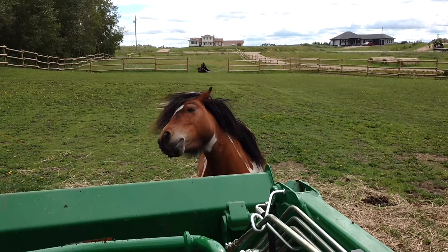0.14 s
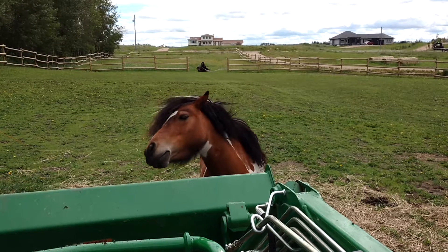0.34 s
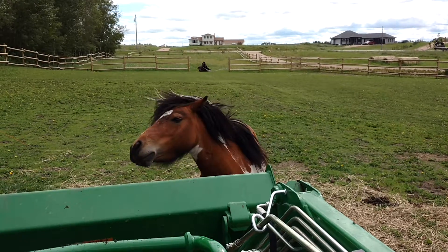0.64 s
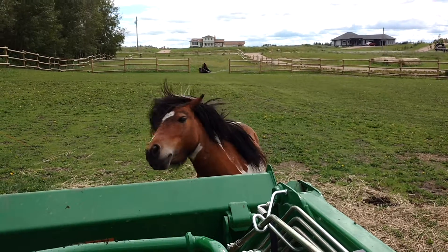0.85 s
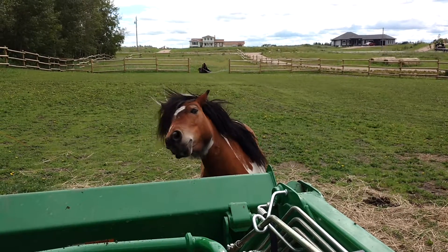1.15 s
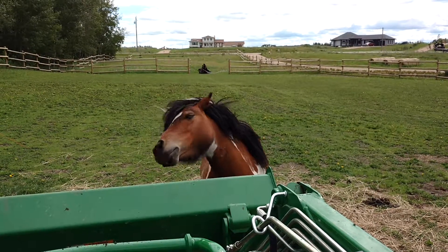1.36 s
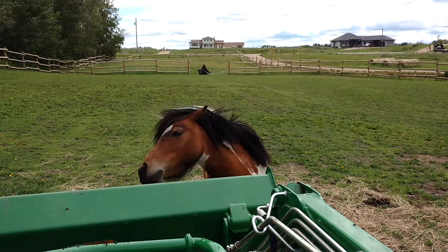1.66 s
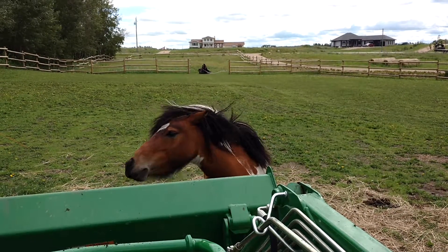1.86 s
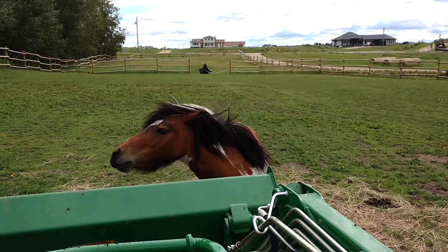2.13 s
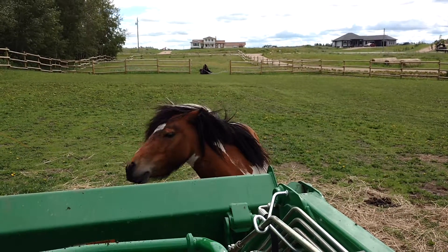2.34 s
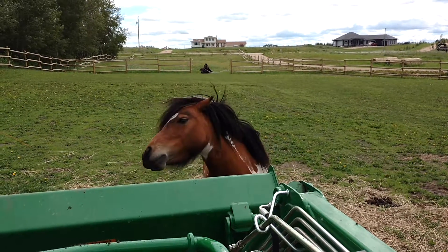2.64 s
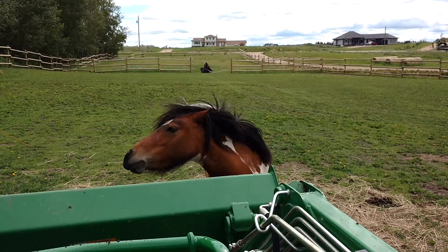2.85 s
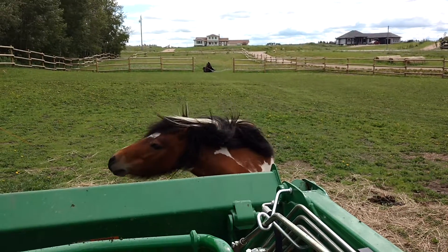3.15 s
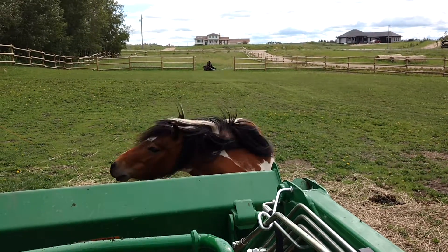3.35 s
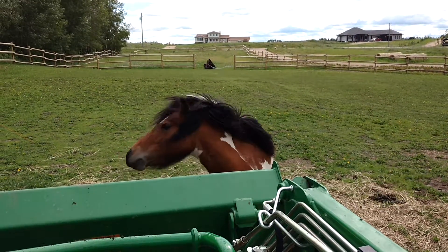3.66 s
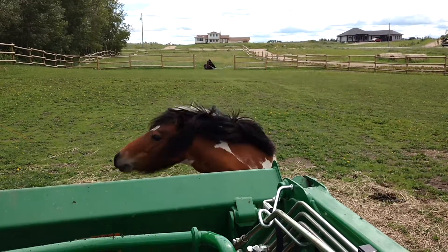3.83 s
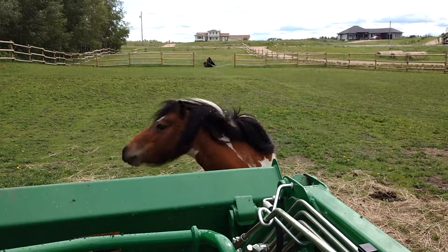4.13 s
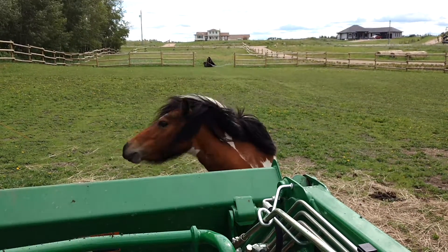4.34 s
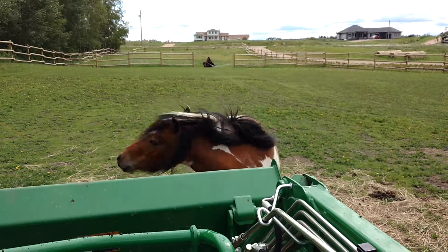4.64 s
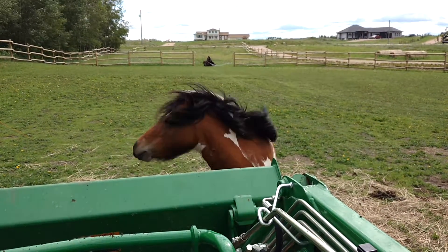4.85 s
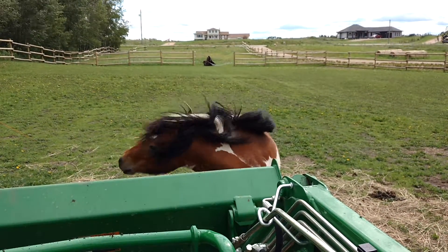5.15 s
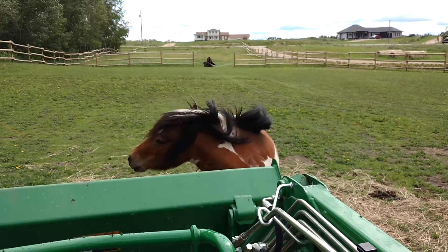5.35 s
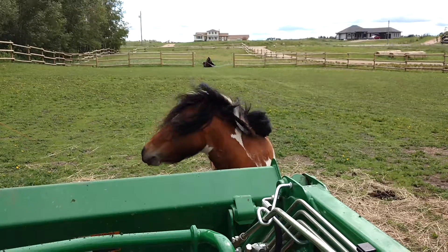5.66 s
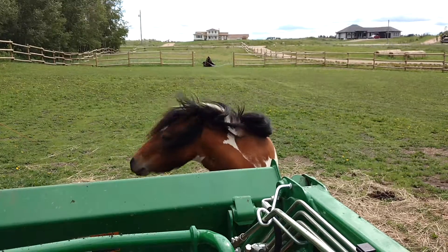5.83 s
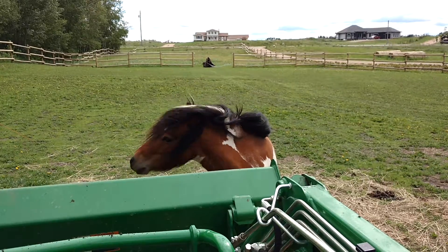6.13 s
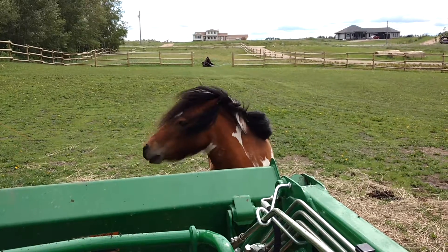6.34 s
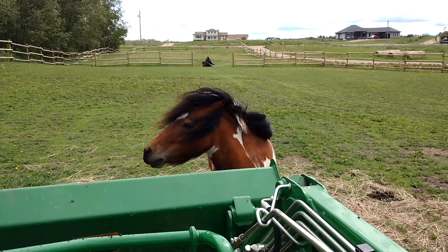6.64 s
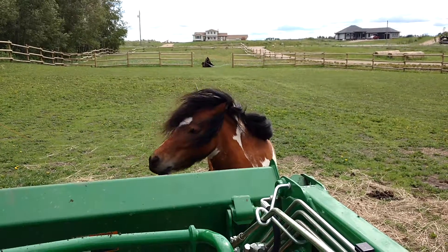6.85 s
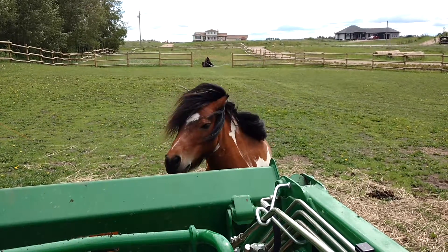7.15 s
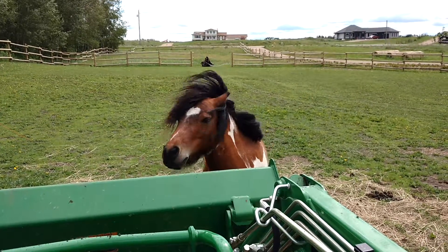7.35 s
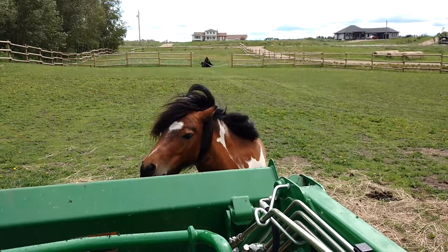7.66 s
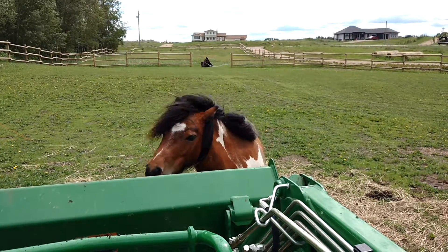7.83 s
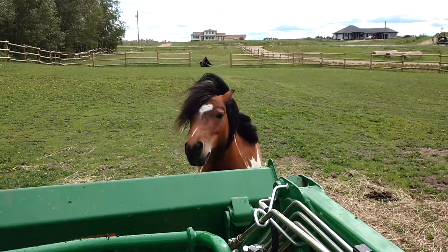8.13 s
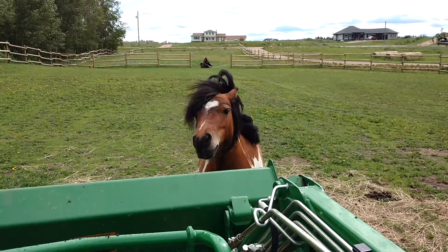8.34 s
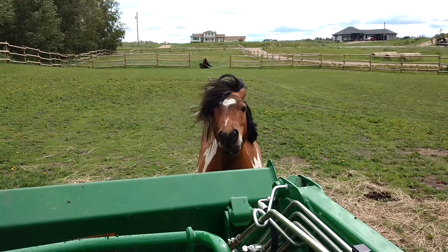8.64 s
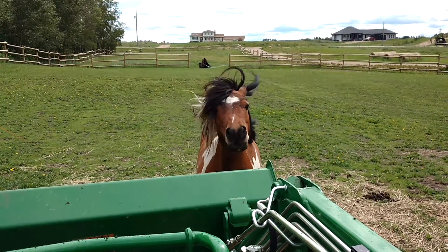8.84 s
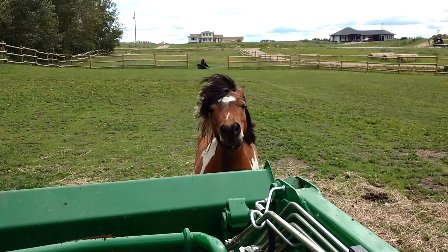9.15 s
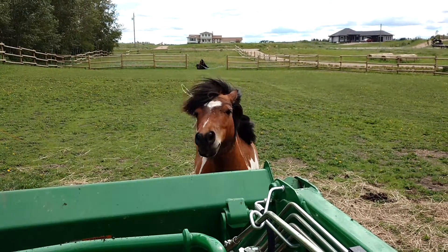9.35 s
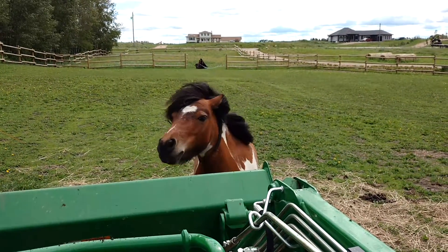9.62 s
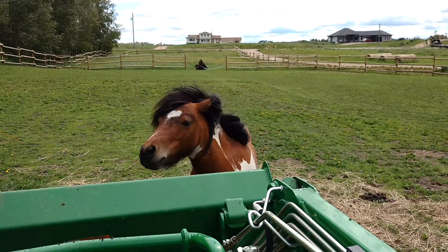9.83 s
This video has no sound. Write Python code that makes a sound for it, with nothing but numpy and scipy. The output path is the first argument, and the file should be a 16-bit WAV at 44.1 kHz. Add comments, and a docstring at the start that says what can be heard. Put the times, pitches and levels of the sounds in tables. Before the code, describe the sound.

From 0 to 10 seconds a small three-cylinder diesel tractor idles nearby in an open pasture. Its pace is constant, about thirteen uneven cycles a second, blurring into a quick chugging rattle: low exhaust drone, short hollow panel thuds, bright metallic knocks and hissy mechanical clatter. Some knocks stand out at irregular moments. Wind is only a faint low breeze at first, with soft buffets near 1.9 and 3.2. From 4.9 a strong gust rumbles and flaps on the close stereo microphone, continuing from 5.6 to 7.1 with brief hard eddies; shorter bursts follow around 7.1 to 8.6. A pop comes near 5.2, others at 7.1 and 7.9. The gust of 8.7 to 9.5 brings a cluster of sharp clicks and thumps from 9.1 to 9.4. Engine loudness dips repeatedly, deepest after 9.1, partly recovering by the end. Dry, wide, no echo.

```python
"""A droning, clattering tractor idles in a windy pasture while gusts buffet a closely spaced microphone pair.
The three-cylinder diesel is a sum of cycle-rate multiples, damped panel thuds, knock-driven noise and
struck block modes, all locked to one crankshaft; its level flutters and dips at listed times.
Wind is low coloured noise under gust and eddy envelopes, mostly opposite in the two channels; pops are
single pressure swings. The pair's spacing cuts notches in sum and difference."""
import sys
import numpy as np
from scipy import signal
from scipy.fft import rfft, irfft, next_fast_len
from scipy.io import wavfile
from scipy.ndimage import map_coordinates

SR = 44100
rng = np.random.default_rng(int(sys.argv[2]) if len(sys.argv) > 2 else 0)


def to_wav(sig):
    """Store sig (one row per channel, or 1-D mono) as 16-bit WAV at the path in sys.argv[1].

    Samples outside -1..1 are clipped; the rate is SR.
    """
    pcm = np.clip(np.atleast_2d(sig), -1, 1) * 32767
    pcm = np.round(pcm).astype(np.int16)
    wavfile.write(sys.argv[1], SR, pcm.T)  # frames by channels


N = 440559
T, HZ = np.arange(N) / SR, np.fft.rfftfreq(N, 1 / SR)


def amp(db):
    """Decibels to gain."""
    return 10 ** (np.asarray(db) / 20)


def unit(x):
    """Scales to rms 1."""
    return x / np.sqrt(np.mean(x ** 2) + 1e-20)


def curve(rows):
    """Joins (s, value) rows by straight lines."""
    return np.interp(T, *np.transpose(rows))


def over_hz(rows):
    """Joins (Hz, value) rows on a log-frequency axis."""
    hz, value = np.transpose(rows)
    return np.interp(np.log(HZ + 1), np.log(hz), value)


def colour(x, spectrum):
    """Filters by a spectrum in dB."""
    return irfft(rfft(x) * amp(over_hz(spectrum)), N)


def blend(a, b, shares):
    """Mixes two sounds, giving b its share of the power at each frequency."""
    share = np.clip(over_hz(shares), 0, 1)
    return irfft(rfft(a) * np.sqrt(1 - share) + rfft(b) * np.sqrt(share), N)


def wander(rate_hz):
    """Slow random drift of rms 1: straight lines between random points."""
    points = rng.standard_normal(2000)
    return np.interp(T * rate_hz, np.arange(2000), points) * np.sqrt(3 / 2)


def drone(turns, gain_db=-2, waver_hz=8):
    """Exhaust and panels: sinusoids at multiples of the cycle rate, each wavering in phase and strength."""
    # multiple of the cycle rate: (centre level [dB], wide level [dB])
    orders = {3: (-54, -45), 6: (-46, -43), 8: (-52, -54), 9: (-48, -45), 11: (-49, -47), 12: (-38, -36.5),
              15: (-45, -47), 18: (-54, -47), 20: (-49, -43), 21: (-44.5, -33), 24: (-44.5, -47),
              28: (-45, -58), 31: (-46, -60), 44: (-58, -47), 59: (-44, -58), 65: (-45, -54),
              69: (-46, -60), 83: (-47, -70), 132: (-42.5, -47)}
    exhaust_lag_cycles, spread_rad, smear_rad, waver = .115, .012, .25, .2
    out = np.zeros((2, N))
    for order, (centre_db, wide_db) in orders.items():
        # the cylinders differ more in timing than in strength: non-firing orders lie in quadrature
        uneven = np.pi / 2 * (order % 3 != 0)
        # pipe and panels hold the higher orders back, which stretches each throb
        held = spread_rad * (order - 45) ** 2
        angle = 2 * np.pi * order * (turns - exhaust_lag_cycles) + uneven - held
        angle = angle + smear_rad * rng.standard_normal() + waver * wander(waver_hz)
        size = np.sqrt(2) * (1 + waver * wander(waver_hz))
        out[0] += amp(centre_db) * size * np.cos(angle)
        out[1] += amp(wide_db) * size * np.sin(angle)
    return amp(gain_db) * out


def thuds(turns, gain_db=-4.0):
    """Panels answer each shove of the engine with a short, hollow swell of tone: centre and wide."""
    # thuds of one cycle: (place in the cycle [0-1], level [dB], pitch [Hz])
    shoves = [(.0007, -25.6, 789), (.0743, -17.8, 594), (.2446, -19, 626), (.3862, -21.8, 738),
              (.4239, -20.8, 574), (.544, -27.5, 730), (.5821, -30, 919), (.761, -20, 577)]
    # panel colour in the centre: (frequency [Hz], gain [dB])
    centre_colour = [(500, -1), (570, .7), (610, 0), (645, 2.7), (680, -3), (740, 3), (800, 3.5), (870, 3)]
    # panel colour out wide: (frequency [Hz], gain [dB])
    wide_colour = [(600, -13), (645, -3), (680, -14), (850, -11)]
    swell_s, uneven_db, length_s = .00423, .4, .06
    t = np.arange(0, length_s, 1 / SR)
    cycles = np.arange(int(turns[-1]) + 1)
    swell = t / swell_s * np.exp(1 - t / swell_s)
    out = np.zeros(N)
    for place, db, hz in shoves:
        force = amp(db + uneven_db * rng.standard_normal(len(cycles)))
        hits = np.bincount(np.searchsorted(turns, cycles + place), force, N + 1)[:N]
        out += signal.oaconvolve(hits, swell * np.sin(2 * np.pi * hz * t))[:N]
    quadrature = signal.hilbert(out, next_fast_len(N))[:N].imag
    return amp(gain_db) * np.array([colour(out, centre_colour), colour(quadrature, wide_colour)])


def cyclic_noise(turns, size=3288):
    """Noise of which a part comes back in every cycle, as the same parts meet again."""
    # part alike in every cycle: (frequency [Hz], share of power [0-1])
    repeating = [(400, .4), (550, .2), (850, .42), (1100, .4), (1800, .55), (3000, .38), (4200, .3),
                 (7000, .08)]
    pattern = unit(irfft(np.exp(2j * np.pi * rng.random(size // 2 + 1))))
    again = map_coordinates(pattern, [turns % 1 * size], order=3, mode="grid-wrap")
    return blend(rng.standard_normal(N), again, repeating)


def ring(pitch_hz, size=2600):
    """The block struck once, centre and wide; the place of the blow favours the modes near one pitch."""
    # block modes: (frequency [Hz], level [dB], t60 [s], wide minus centre [dB])
    block = [(1120, 0, .03, 0), (1771, -2.5, .032, -4), (2000, 0, .02, 1), (2470, 1, .032, 0),
             (2670, 1, .032, -2), (2790, -2, .025, -3), (2970, 1, .028, -.5), (3070, 0, .02, -1),
             (3460, -4, .035, -3), (4690, -6, .03, 0), (5560, -2, .05, 0)]
    reach_hz, spill, rise_s, scatter_rad = 220, .08, .0007, .8
    t = np.arange(size) / SR
    hz, db, t60_s, wide_db = np.transpose(block)[:, :, None]
    weight = spill + np.exp(-((hz - pitch_hz) / reach_hz) ** 2)
    angle = 2 * np.pi * hz * t
    wide_angle = angle + scatter_rad * rng.standard_normal(hz.shape)
    modes = np.array([np.sin(angle), amp(wide_db) * np.sin(wide_angle)])
    decay = amp(db - 60 * t / t60_s)
    return (weight * decay * modes).sum(1) * (1 - np.exp(-t / rise_s))


def blows(turns):
    """Every blow of every cycle excites clatter (its envelope) and the ringing block (centre and wide)."""
    # combustion knocks, piston slaps and valve ticks of one cycle:
    # (place in the cycle [0-1], clatter level [dB], ring level [dB], pitch rung hardest [Hz])
    knocks = [(.05, -8, -12, 3050), (.085, 3.2, -7, 1970), (.087, 1, 3.4, 2950), (.125, -4, -8, 1800),
              (.155, 1, -2.5, 2700), (.19, -1, -2, 2780), (.205, -1, -4.5, 1950), (.335, -9, -11, 2600),
              (.365, -9, -6.5, 1120), (.385, 1, -5, 3500), (.403, 1.5, -5, 5560), (.42, 1, 0, 2450),
              (.445, 0, -2, 1900), (.465, -2, 1, 2680), (.55, -4, -9, 2150), (.585, -7, -6, 1120),
              (.635, -7, -9, 2650), (.72, -2, -6, 3400), (.755, 0, 1.5, 2560), (.79, -3, -4, 1950),
              (.86, -4, -7, 2850), (.925, -4, -11, 5560)]
    # first cylinder fires hard, its knock stands out: (time [s], extra level of the ring [dB])
    hard_firings = [(.23, 3), (.45, 5.5), (.6, 3), (1.05, 3), (1.2, 3), (1.5, 4), (1.8, 4), (2.09, 5),
                    (2.39, 5), (2.84, 4), (2.99, 3.5), (3.51, 3), (3.81, 3), (4.41, 3), (4.78, 5.5),
                    (5.08, 4), (5.45, 4), (5.82, 5.5), (6.05, 3.5), (6.12, 5), (6.49, 6.5), (7.09, 5.5),
                    (7.46, 5.5), (7.54, 3.5), (7.91, 4.5), (8.13, 5), (9.1, 6)]
    # where its knocks lie: (from, to), place in the cycle [0-1]
    first_cylinder = (.08, .13)
    jitter_cycles, decay_s, uneven_db = .001, .006, 1.9
    between = .52  # envelope floor between blows
    hard_clatter = .2  # part of the extra dB that the clatter gets
    cycles = np.arange(int(turns[-1]) + 1)
    clatter, ringing = np.zeros(N), np.zeros((2, N))
    hard_db = np.zeros(len(cycles))
    for s, db in hard_firings:
        hard_db[int(np.interp(s, T, turns))] = db
    for place, clatter_db, ring_db, pitch_hz in knocks:
        force, late = rng.standard_normal((len(cycles), 2)).T
        extra_db = hard_db * (first_cylinder[0] < place < first_cylinder[1])
        force_db = uneven_db * force * (extra_db == 0)
        at = np.searchsorted(turns, cycles + place + jitter_cycles * late)
        blow_power = amp(clatter_db + force_db + hard_clatter * extra_db) ** 2
        clatter += np.bincount(at, blow_power, N + 1)[:N]
        struck = ring(pitch_hz)
        for start, gain in zip(at, amp(ring_db + force_db + extra_db)):
            ringing[:, start:start + struck.shape[1]] += gain * struck[:, :N - start]
    power = signal.lfilter([1], [1, -np.exp(-2 / (decay_s * SR))], clatter)
    return np.sqrt(between ** 2 + power), ringing / ringing[0].std()


def with_wide(centre, other):
    """A centre sound and its wide part, which holds some of the centre's own sound at each frequency."""
    # part that is the centre's own: (frequency [Hz], share of power [0-1])
    shared = [(200, .2), (700, .5), (1200, .5), (2000, .15), (3200, .3), (5500, .2), (7500, .03)]
    return centre, blend(other, centre, shared)


def dips():
    """Gain that flutters slightly, eases down into each dip, holds, then recovers; the deepest dip rules."""
    # level dips: (time [s], depth [dB], fall [s])
    falls = [(.29, 2.5, 0.14), (.55, 2.5, 0.19), (2.36, 2.5, 0.063), (3.14, 3.5, 0.11), (4.48, 3, 0.11),
             (4.83, 7.5, 0.19), (5.16, 9, 0.16), (5.52, 7, 0.074), (5.8, 5, 0.1), (6.45, 3.5, 0.075),
             (7.02, 7, 0.17), (7.85, 5.5, 0.07), (8.27, 4, 0.095), (8.52, 5.5, 0.069), (9.09, 14, .12),
             (9.34, 13.5, 0.089), (9.55, 11.5, 0.11)]
    hold_s, recover_s, flutter_db, flutter_hz = 0.0032, 0.54, .3, 12
    depth_db = np.zeros(N)
    for s, db, fall_s in falls:
        fall = np.sin(np.pi / 2 * np.clip((T - s) / fall_s, 0, 1)) ** 2
        recovery = np.exp(-np.maximum(T - s - fall_s - hold_s, 0) / recover_s)
        depth_db = np.maximum(depth_db, db * fall * recovery)
    return amp(flutter_db * wander(flutter_hz) - depth_db)


def engine(clatter_db=-27, wide_db=-28.0, gain_db=3.5):
    """Drone, thuds, clatter and block ring, all locked to the crankshaft: centre and wide channels."""
    # four-stroke cycles: (time [s], cycle rate [Hz])
    speed = [(0, 13.416), (.7, 13.426), (1.3, 13.414), (2.2, 13.405), (3, 13.412), (3.7, 13.427),
             (4.2, 13.421), (5, 13.394), (6.3, 13.411), (10, 13.412)]
    # clatter that follows the knocks: (frequency [Hz], share of power [0-1])
    pulsing = [(150, .15), (600, .12), (1100, .28), (1800, .7), (3000, .62), (4500, .42), (9000, .26)]
    # clatter spectrum in the centre: (frequency [Hz], level [dB])
    clatter_colour = [(58, -47), (95, -9.5), (155, -4.5), (480, -5), (660, -5.5), (800, -2.5), (980, -4),
                      (1130, -3.5), (1400, -7.5), (1900, -6.5), (2700, -5), (3300, -7.5), (4300, -12.5),
                      (6300, -14), (9000, -22.5), (12000, -32), (15300, -43)]
    # clatter spectrum out wide: (frequency [Hz], level [dB])
    clatter_wide_colour = [(20, -18), (58, -1), (150, 4), (250, 5), (330, -3), (620, -2), (900, -1),
                           (1800, 2), (2600, 9), (3500, 2.5), (4300, 0), (6300, -3), (9000, -9.5),
                           (12000, -22), (15300, -30)]
    ring_db, ring_wide_db = -29.3, -30.6
    turns = np.cumsum(curve(speed)) / SR  # engine cycles so far
    pulse, ringing = blows(turns)
    rattles = []
    for _ in range(2):
        steady = cyclic_noise(turns)
        knocking = unit(pulse * cyclic_noise(turns))
        rattles.append(blend(steady, knocking, pulsing))
    rattle, rattle_wide = with_wide(*rattles)
    centre = amp(clatter_db) * unit(colour(rattle, clatter_colour)) + amp(ring_db) * ringing[0]
    wide = amp(wide_db) * unit(colour(rattle_wide, clatter_wide_colour)) + amp(ring_wide_db) * ringing[1]
    return amp(gain_db) * (np.array([centre, wide]) + drone(turns) + thuds(turns)) * dips()


def gusts():
    """Strength of the wind: over a light breeze each gust springs up, slackens and dies away."""
    # long gusts: (start [s], length [s], level before slackening [dB])
    blasts = [(4.4, .13, -82), (4.903, 0.63, -20.5), (5.56, 1.55, -22.5), (7.543, 0.36, -36),
              (8.734, 0.81, -23)]
    breeze_db, rise_s, sag_db_per_s, release_s = -37, 0.027, 7, 0.15
    strength = np.full(N, amp(breeze_db))
    for start, length, db in blasts:
        age = np.maximum(T - start, 0)
        release = np.exp(-np.maximum(age - length, 0) / release_s)
        strength += np.minimum(age / rise_s, 1) * amp(db - sag_db_per_s * age) * release
    return strength


def wind(gain_db=-1, centre_db=-14, lumps_db=-1, lumps_hz=22, split_hz=380, rightward=0.15):
    """Lumpy turbulence at the ports, mostly opposite in the two; eddies are brighter, some press on both."""
    # single hard eddies: (time [s], level [dB], length [s], centre relative to wide [dB])
    buffets = [(1.908, -20, 0.06, -24), (3.203, -17.5, 0.053, -11), (4.932, -14.5, 0.045, -10.5),
               (5.04, -20, 0.032, -9), (5.12, -19, .07, -9.5), (5.278, -15, .035, -10.5),
               (5.373, -15, .02, -20), (5.663, -20.5, .025, -13), (5.717, -25, 0.041, -4),
               (5.8, -22, 0.046, -7), (5.952, -17, 0.021, -10), (6.04, -21, .03, -22),
               (6.12, -19, 0.043, -9), (6.193, -44, 0.022, -12), (6.265, -23, 0.037, -9),
               (6.693, -17, 0.015, -13), (6.94, -18, 0.051, -11), (7.023, -20, .02, -19),
               (7.139, -13, 0.013, -16), (7.342, -14, 0.011, -13), (7.717, -22.5, 0.029, -7),
               (7.828, -20, 0.025, -8), (7.91, -15, 0.047, -16), (8.342, -17, 0.015, -10.5),
               (8.57, -15, .022, -13), (8.952, -20, 0.019, -10), (9.05, -17, 0.016, -10),
               (9.12, -18, 0.05, -17), (9.163, -13, .013, -13), (9.264, -17, 0.012, -10),
               (9.323, -16.5, 0.012, -10), (9.627, -18, 0.036, -13.5), (9.9, -26, .02, -15)]
    # spectrum of the turbulence: (frequency [Hz], level [dB])
    rumble = [(20, -30), (45, -15), (80, -2.5), (130, .5), (190, -0.5), (300, -5.5), (450, -10), (700, -23),
              (1200, -29), (3000, -53), (9000, -90)]
    # extra colour in the centre, weakest in the deepest rumble: (frequency [Hz], gain [dB])
    rumble_centre = [(50, -9), (130, 1.5), (500, 2)]
    bright_db = 0.5
    lumps = amp(lumps_db * wander(lumps_hz))
    flow = (gusts() * lumps * amp([[centre_db], [0]])) ** 2
    eddies = np.zeros((2, N))
    for s, db, length, press_db in buffets:
        near = slice(max(int((s - 2 * length) * SR), 0), int((s + 2 * length) * SR))
        burst = np.exp(-np.pi * ((T[near] - s) / length) ** 2)
        eddies[:, near] += amp([[db + press_db], [db]]) ** 2 * burst
    # flow and eddies are powers
    low, high = np.sqrt(flow + eddies), np.sqrt(flow + eddies * amp(bright_db) ** 2)
    air = unit(colour(rng.standard_normal((2, N)), rumble))
    bass = irfft(rfft(air) / (1 + (HZ / split_hz) ** 4), N)
    centre, wide = amp(gain_db) * (bass * low + (air - bass) * high)
    return np.array([colour(centre - rightward * wide, rumble_centre), wide])


def pops(centre_share=0.35):
    """Sharp knocks and thumps: each is one pressure swing with a rebound on either side."""
    # (time [s], level [dB], width [s])
    knocks_and_thumps = [(5.156, -16, .0012), (7.1474, -15, .00059), (7.9106, -12.5, .00065),
                         (7.9405, -16, .0007), (9.097, -13, .0018), (9.1183, -13, .0005),
                         (9.1235, -12, .0016), (9.1654, -9.5, .00044), (9.1735, -9.5, .0022),
                         (9.4055, -9, .0013)]
    swing = np.zeros(N)
    for s, db, width_s in knocks_and_thumps:
        u = np.minimum(((T - s) / width_s) ** 2, 50)
        swing += amp(db) * (1 - 2 * u) * np.exp(-u)
    slope = np.gradient(swing)
    return np.array([centre_share * slope / np.abs(slope).max(), swing])


def scene():
    """Left and right from the centre and wide parts of all sources."""
    centre, wide = engine() + wind() + pops()
    return np.array([centre + wide, centre - wide])


def record(dry):
    """The pair's spacing cuts narrow notches in sum and difference in turn; then its lean and band limit."""
    # (frequency [Hz], left minus right [dB])
    lean_db = [(50, 1.5), (150, 2.5), (400, 3.5), (760, 1.5), (1200, -1), (1900, 7.5), (2900, -4.5),
               (3700, 0.5), (5500, -2.5), (14000, 1)]
    # breadth of the notches, 1 for a plain comb: (centre, wide)
    notch_breadth = (0.95, 0.91)
    pair_delay_s, edge_hz = .000398, 15450
    centre, wide = rfft(dry[0] + dry[1]) / 2, rfft(dry[0] - dry[1]) / 2
    angle = np.pi * HZ * pair_delay_s
    combs = np.array([np.sin(np.maximum(angle, np.pi / 2)), np.cos(angle)])  # the bass stays whole
    combs = np.sign(combs) * np.abs(combs) ** np.array(notch_breadth)[:, None]
    centre = centre * combs[0]
    wide = wide * combs[1] * np.exp(1j * np.clip(angle - np.pi / 4, 0, np.pi / 2))
    lean = amp(over_hz(lean_db) / 2)
    edge = np.clip((edge_hz - HZ) / 150, 0, 1)
    return irfft(np.array([(centre + wide) * lean, (centre - wide) / lean]) * edge, N)


dry = scene()
out = record(dry)
to_wav(out)
```